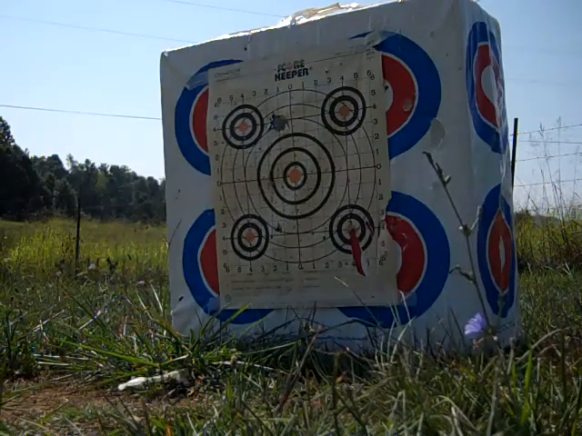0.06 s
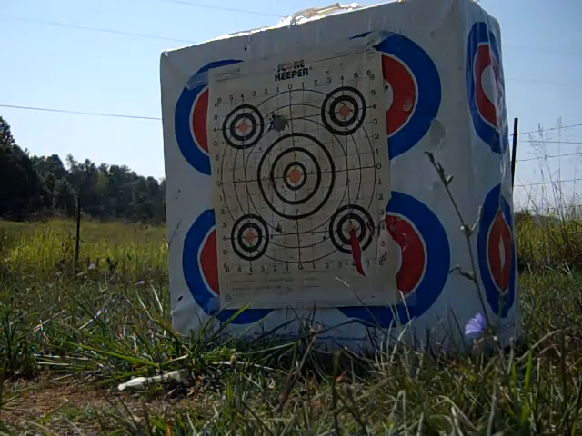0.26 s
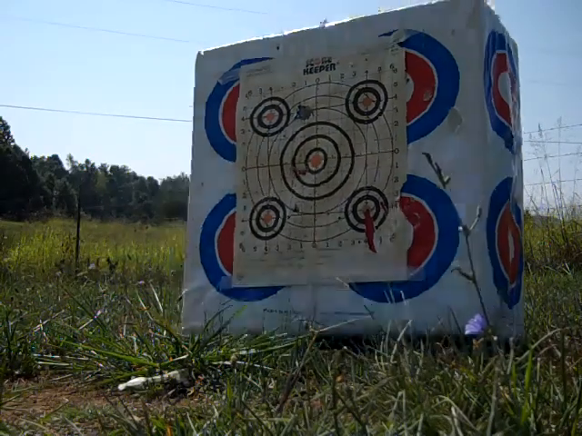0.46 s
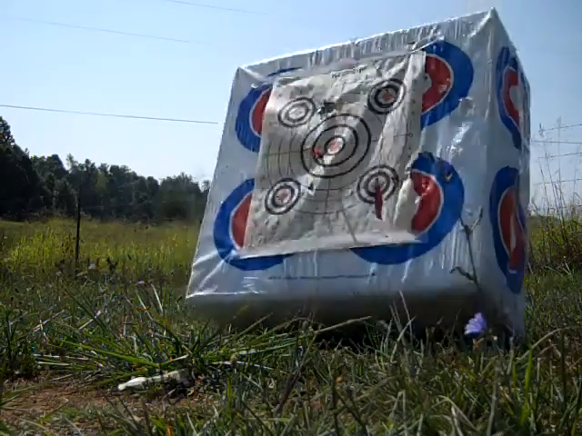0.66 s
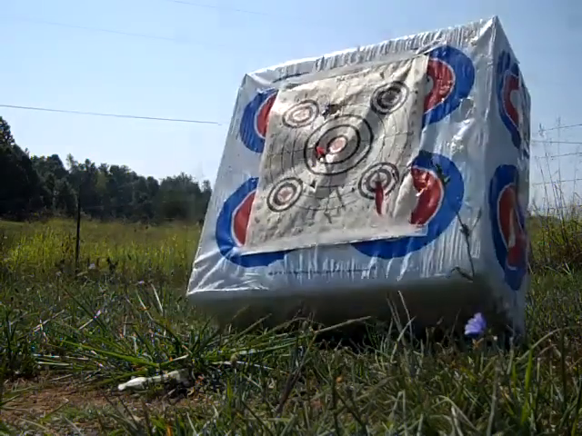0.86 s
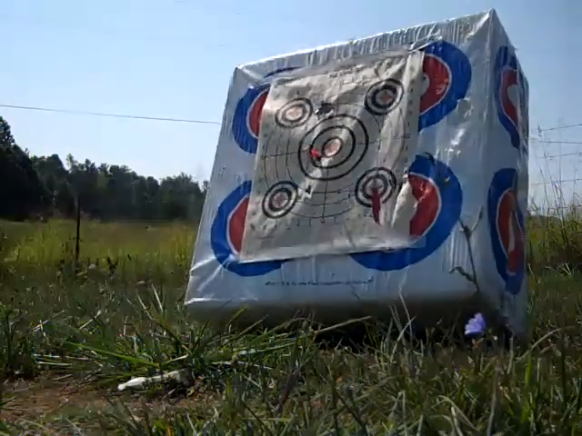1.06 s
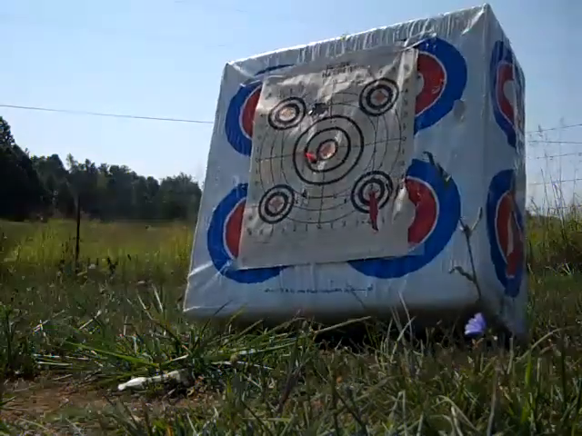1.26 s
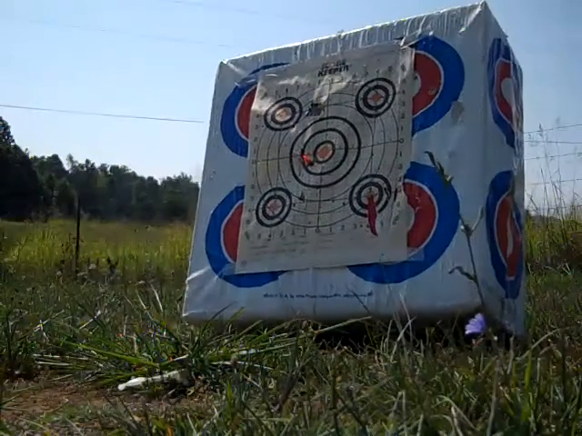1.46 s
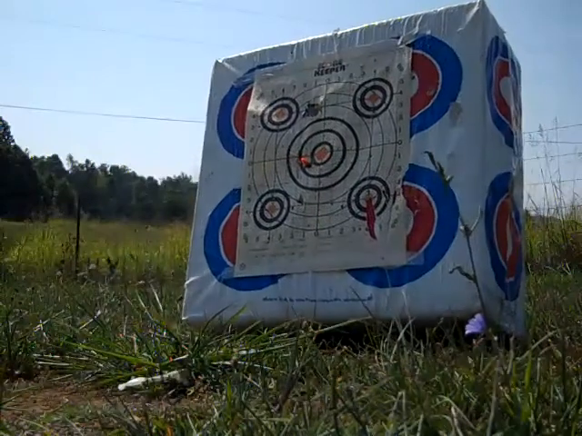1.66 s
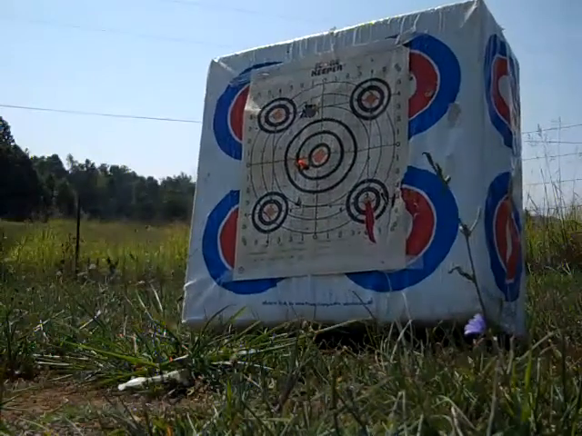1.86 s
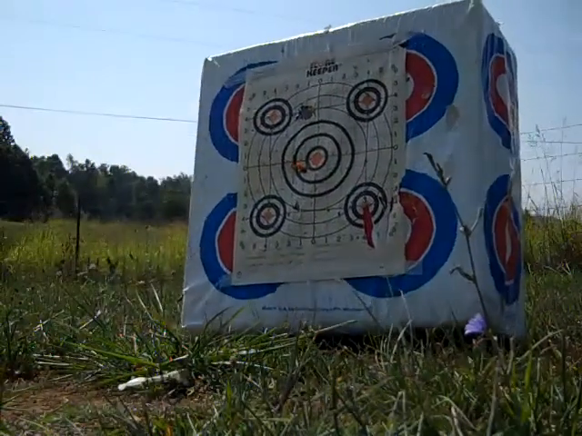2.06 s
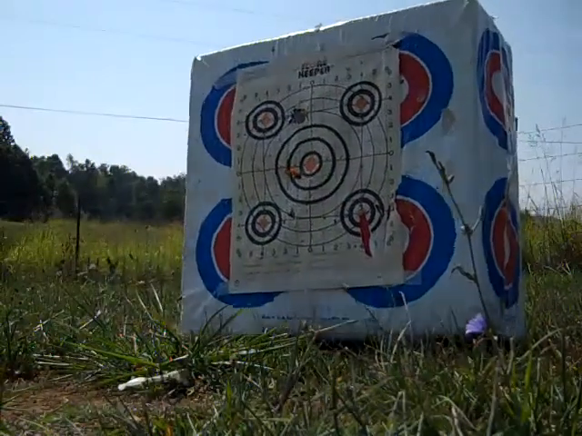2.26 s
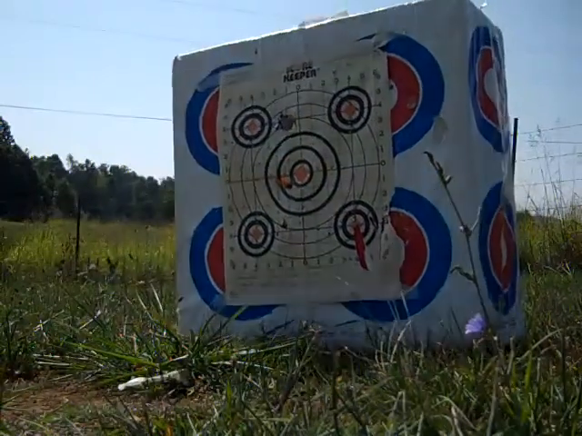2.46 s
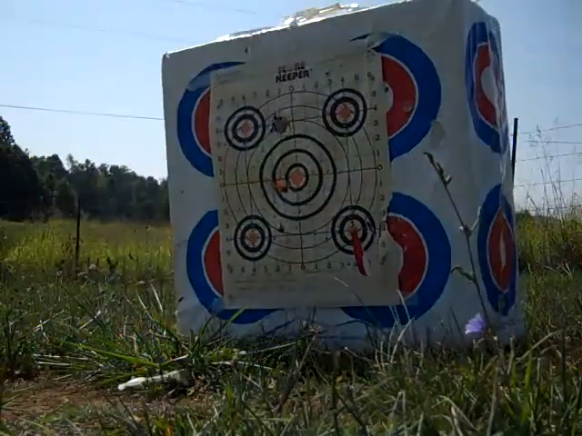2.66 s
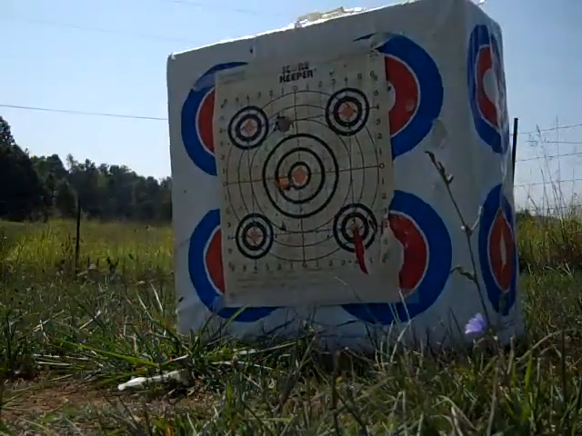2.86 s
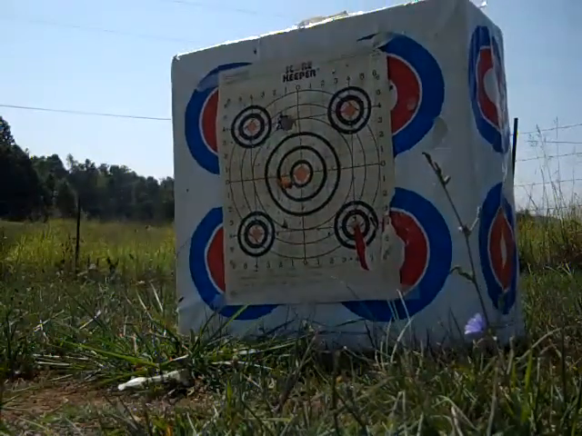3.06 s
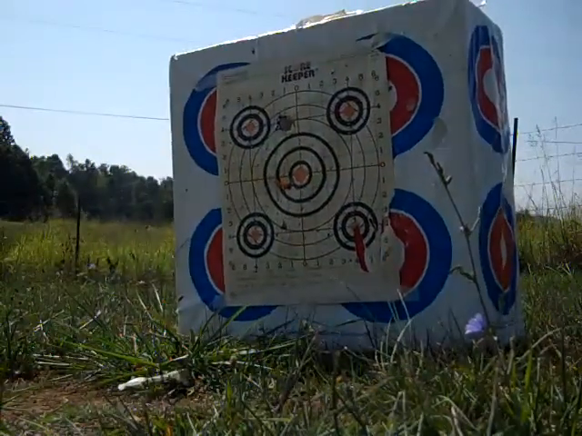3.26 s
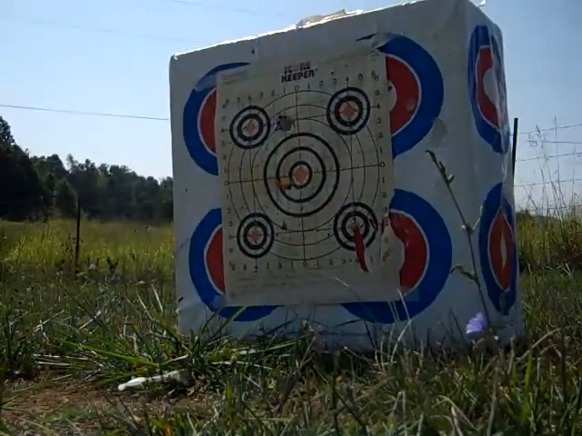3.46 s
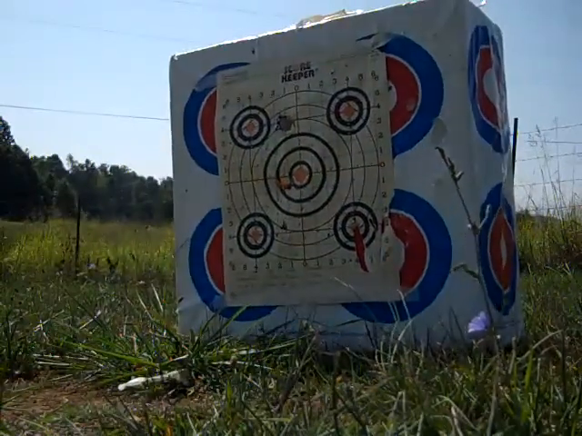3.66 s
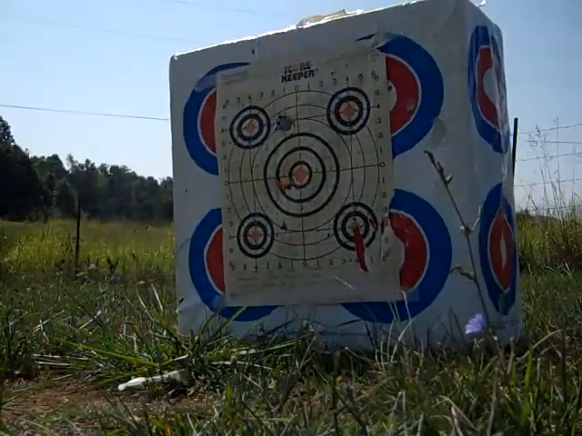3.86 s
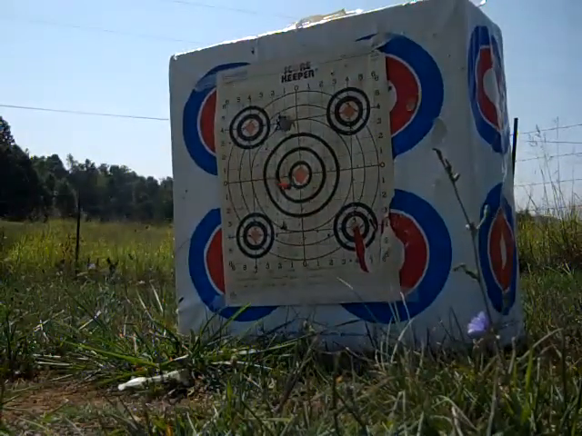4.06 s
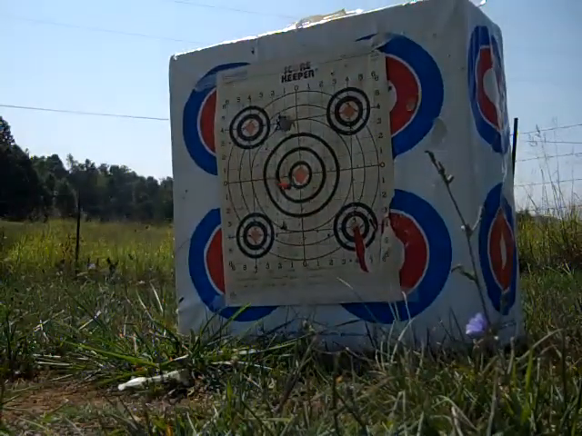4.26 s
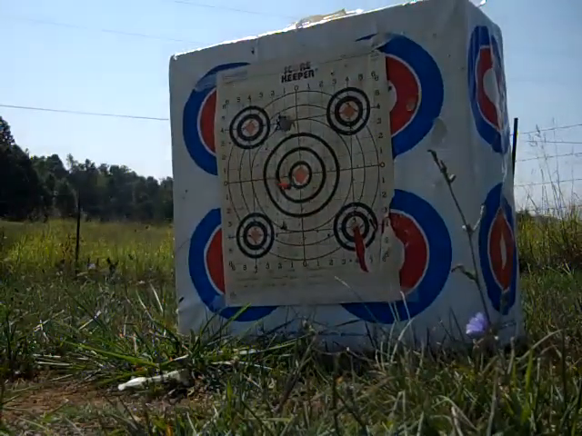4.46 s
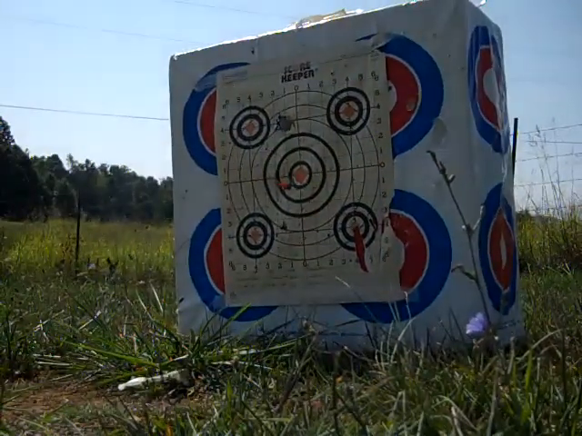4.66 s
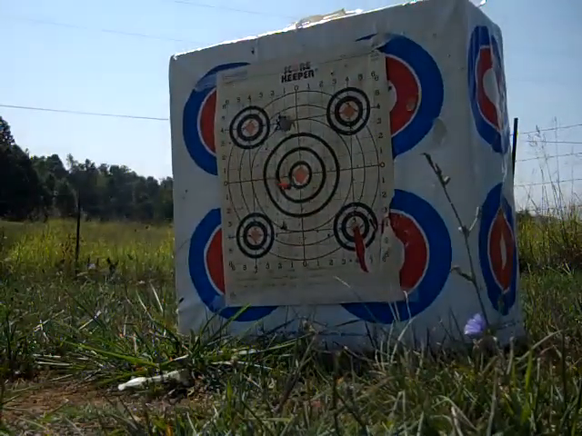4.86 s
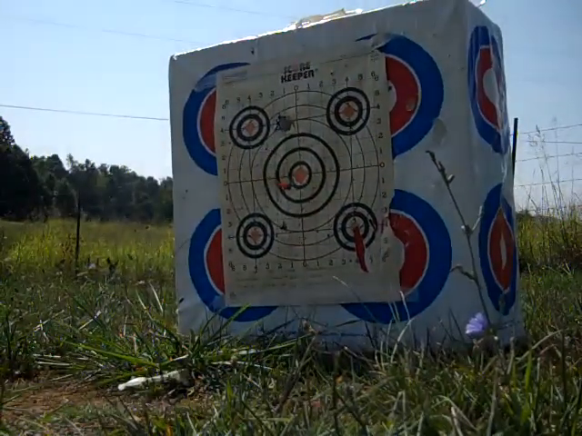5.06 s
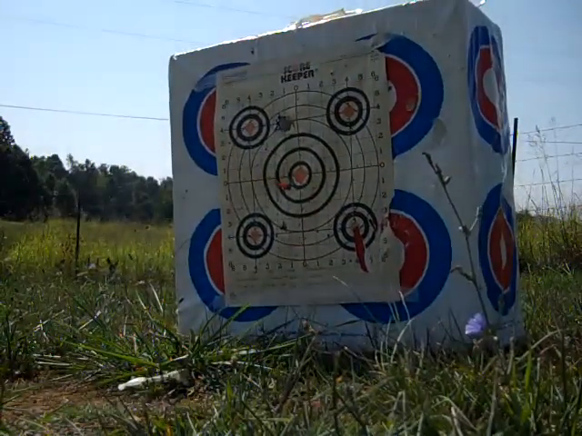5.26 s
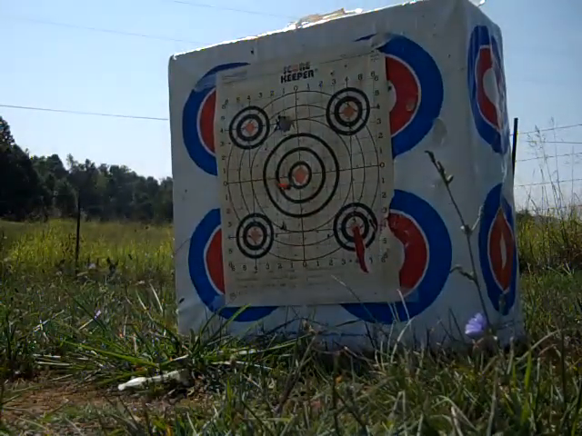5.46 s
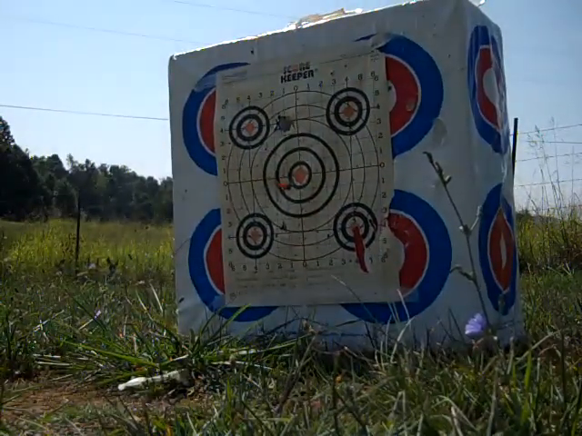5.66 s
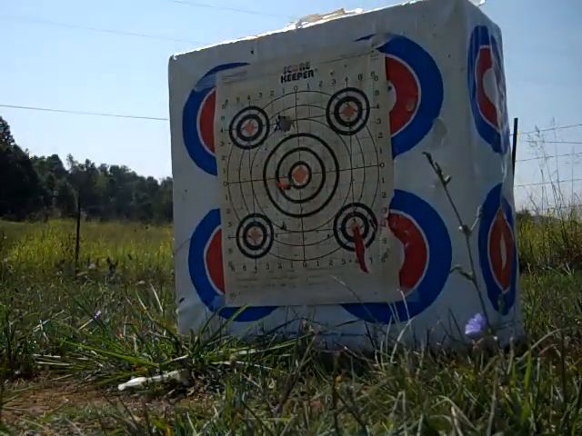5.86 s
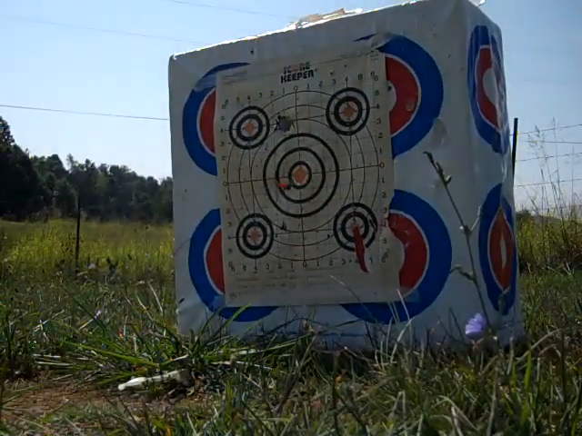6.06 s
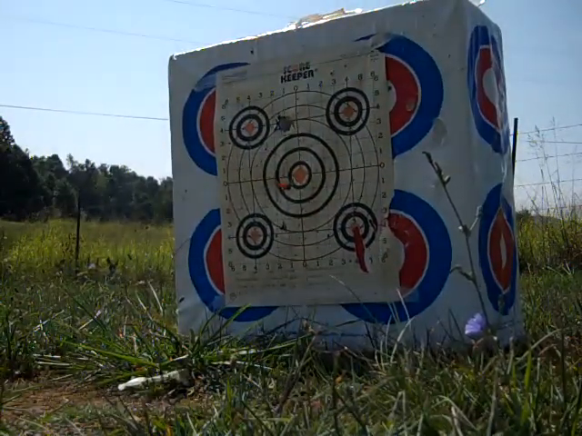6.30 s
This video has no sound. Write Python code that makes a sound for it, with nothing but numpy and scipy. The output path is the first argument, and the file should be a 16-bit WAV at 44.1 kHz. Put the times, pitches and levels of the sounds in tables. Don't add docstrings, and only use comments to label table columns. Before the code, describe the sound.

In an open grassy field, crickets pulse and a far road drones. After a faint bow release, an arrow hisses closer and hits a foam block with a hard, clipped thwack. The shaft scrapes in, plastic wrap pops and crackles as the block rocks, then settles with small knocks. A small stereo camera near the target picks up low wind buffeting and distant bird chirps.

```python
import sys
import numpy as np
from scipy import signal
from scipy.fft import rfft, irfft, next_fast_len
from scipy.io import wavfile
from scipy.ndimage import uniform_filter1d

SR = 44100
rng = np.random.default_rng(int(sys.argv[2]) if len(sys.argv) > 2 else 0)


def gain_from_decibels(decibels):
    exponent = np.asarray(decibels, float) / 20
    return 10 ** exponent


def unload_wav(signal):
    wavfile.write(
        sys.argv[1],
        SR,
        np.round(np.clip(np.atleast_2d(signal).T, -1, 1) * 32767).astype(np.int16),
    )


N = 279153
TIME = np.arange(N) / SR
SIZE = next_fast_len(N)
FREQ = np.arange(SIZE // 2 + 1) * SR / SIZE + 1e-3


def unit(x):
    return x / np.sqrt(np.mean(x ** 2))


def along(hz, values):
    return np.interp(np.log(FREQ), np.log(hz), values)


def colour(x, points):
    hz, db = np.transpose(points)
    return irfft(rfft(x, SIZE) * gain_from_decibels(along(hz, db)), SIZE)[:N]


def ring(x, hz, t60_s):
    pole = np.exp(2j * np.pi * hz / SR - np.log(1000) / (t60_s * SR))
    return signal.lfilter([1], [1, -pole], x).imag


def walk(rate_hz):
    k = int(SR / rate_hz)
    steps = np.repeat(rng.standard_normal(N // k + 1), k)
    return unit(uniform_filter1d(uniform_filter1d(steps, k), k)[:N])


def crackle(spread_db):
    size_db = spread_db * np.minimum(rng.exponential(size=N), 6)
    return unit(rng.standard_normal(N) * gain_from_decibels(size_db))


def add(out, s, db, hz, cycles, swing=0):
    reach = int(2 * cycles / hz * SR)
    i = np.arange(max(int(s * SR) - reach, 0), min(int(s * SR) + reach, N))
    turns = (TIME[i] - s) * hz
    envelope = np.exp(-(1.61 * turns / cycles) ** 2)
    out[i] += gain_from_decibels(db) * np.cos(2 * np.pi * turns + np.round(swing) * np.pi / 2) * envelope


def swell(start, peak, end, db):
    edge_db, die_s = -9, 0.036
    times = [start - die_s, start, peak, end, end + die_s]
    shape_db = np.interp(TIME, times, [-40, edge_db, 0, edge_db, -40], left=-120, right=-120)
    return gain_from_decibels(db + shape_db)


def joined(gains, rest_db):
    return np.sqrt(gain_from_decibels(rest_db) ** 2 + sum(gain ** 2 for gain in gains))


def road():
    # hz, level_db
    rumble = [(60, -17), (150, 1.5), (300, -1.5), (480, -3), (560, -17), (700, -33.5)]
    # start_s, peak_s, end_s, level_db
    vehicles = [(-.1, 0.28, 0.65, -45.5), (1.083, 1.297, 1.51, -45), (1.65, 1.995, 2.45, -47),
                (2.904, 3.246, 3.9, -51), (4.203, 4.657, 5.03, -50.5), (5.05, 5.255, 6.06, -48.5),
                (5.397, 5.65, 5.9, -48), (5.95, 6.15, 6.3, -49), (2.3, 2.45, 2.68, -49)]
    spectrum = [(19.9, -49.5)] + rumble + [(2000, -68)]
    mid = unit(colour(rng.standard_normal(N), spectrum))
    side = unit(colour(rng.standard_normal(N), spectrum))
    level = joined([swell(*row) for row in vehicles], rest_db=-54.5) * gain_from_decibels(2.06 * walk(30))
    return level * np.array([gain_from_decibels(2.0) * (mid + 0.29 * side), gain_from_decibels(-1.5) * (mid - 0.33 * side)])


def wind():
    # hz, level_db
    turbulence = [(12, -41), (30, 2), (60, 5.5), (120, 3.5), (190, -5.5), (320, -17.5), (600, -35)]
    # start_s, peak_s, end_s, level_db, left_minus_right_db
    gusts = [(.05, 0.298, 0.76, -52, -10), (0.677, 0.746, 0.79, -44, 2), (0.934, 1.0, 1.13, -51, 0),
             (1.197, 1.366, 1.43, -49, -16), (1.42, 1.498, 1.54, -38.5, 0), (1.544, 1.626, 1.99, -42, -7.5),
             (1.999, 2.205, 2.2, -52, -4.5), (2.37, 2.497, 2.76, -43, 1.5), (2.8, 2.975, 3.14, -40, 3),
             (3.172, 3.271, 3.42, -37.5, 7), (3.423, 3.478, 3.52, -44, -4), (3.541, 3.618, 3.74, -37, 4.5),
             (3.761, 3.846, 4.13, -41.5, 0.5), (4.05, 4.219, 4.65, -44.5, -5),
             (4.649, 4.78, 5.05, -43.5, -9.5), (5.0, 5.111, 5.2, -40, -8.5), (5.523, 5.619, 5.55, -45.5, 5),
             (6.049, 6.121, 6.2, -55, 6)]
    # centre_s, peak_db,
    # pitch_hz, port (0 left, 1 right)
    buffets = [(0.111, -25, 202, 0), (.982, -31.5, 59.7, 1), (1.445, -30, 133, 1), (1.491, -28, 123, 0),
               (1.567, -26.5, 105, 0), (1.579, -27, 109, 1), (1.602, -24.5, 120, 1), (1.691, -26.5, 111, 1),
               (2.484, -28.5, 98.5, 0), (2.527, -29, 117, 0), (3.023, -28, 91.3, 1), (3.078, -27, 74.4, 1),
               (3.216, -21, 111, 0), (3.234, -16.5, 129, 0), (3.287, -26, 82, 1), (3.293, -20.5, 164, 0),
               (3.313, -26, 77.5, 1), (3.347, -20.5, 167.5, 0), (3.606, -25, 98, 1), (3.619, -23.5, 113, 0),
               (3.647, -28.5, 85, 0), (3.655, -16, 154, 1), (4.152, -24.5, 122, 1), (4.19, -25.5, 92, 1),
               (4.291, -27, 121, 0), (4.322, -26, 108.5, 1), (4.397, -28, 104, 1), (4.839, -24.5, 97, 1),
               (5.068, -26.5, 95.4, 1), (5.09, -26.5, 89, 1), (3.239, -35.5, 410, 0), (3.241, -25, 251, 0),
               (3.352, -37, 410, 0), (3.587, -29.5, 120, 0), (3.558, -28.5, 70, 1), (3.452, -31.5, 171, 0)]
    beds = []
    for side in (1, -1):
        bed = unit(colour(rng.standard_normal(N), turbulence + [(3000, -70.5)]))
        gains = [swell(start, peak, end, db) * gain_from_decibels(side * pan_db / 2)
                 for start, peak, end, db, pan_db in gusts]
        beds.append(bed * gain_from_decibels(2.0 * walk(20)) * joined(gains, rest_db=-53))
    out = np.array(beds)
    for (s, db, hz, port), way in zip(buffets, rng.standard_normal(len(buffets))):
        eddy = np.zeros(N)
        add(eddy, s, db, hz, cycles=0.9)
        out[int(port > .5)] += np.sign(way) * eddy
    return out


def chorus():
    # hz, left_db, right_db
    field = [(610, -82.5, -98), (1086, -88.5, -100), (2100, -96, -100), (2895, -89.5, -91.5),
             (4600, -81, -83), (4880, -83.5, -85.5), (6000, -82, -80), (7000, -77, -74), (7570, -70, -80.5),
             (8270, -71.5, -83.5), (8840, -83.5, -104), (9405, -88, -116), (11130, -91.5, -106),
             (13990, -91, -107)]
    # hz, shared_part (0-1), left_lead (radians)
    likeness = [(600, 0.24, 1.5), (1500, 0.09, 2.9), (3100, 0.48, 1.3), (5070, 0.46, 3.2),
                (6370, 0.99, 3.88), (7010, 0.12, 4.67), (8150, 0.06, 8), (10000, 0, 6.5)]
    # start_s, peak_s, end_s, level_db
    breeze = [(3.9, 4.5, 7.5, -2.5)]
    hz, *port_db = np.transpose(field)
    like_hz, alike, lead = np.transpose(likeness)
    share = np.clip(along(like_hz, alike), 0, 1)
    flicker = np.array([.6 * walk(14 + 6 * k) for k in range(3)])
    common, left, right = rfft(rng.standard_normal((3, N)) * gain_from_decibels(flicker), SIZE)
    shared = np.array([common, common * np.exp(-1j * along(like_hz, lead))])
    pair = np.sqrt(share) * shared + np.sqrt(1 - share) * np.array([left, right])
    fade = np.clip(FREQ / hz[0], 0, 1) ** 2
    pair = pair * fade * gain_from_decibels(np.array([along(hz, db) for db in port_db])) * np.sqrt(SR / 2)
    top = np.clip((FREQ - 9000) / 1500, 0, 1)
    leaves = joined([swell(*row) for row in breeze], rest_db=-4) * gain_from_decibels(1.4 * walk(60))
    return irfft(pair * (1 - top), SIZE)[:, :N] + leaves * irfft(pair * top, SIZE)[:, :N]


def crickets():
    # pitch_hz, level_db, chirp_s, left_minus_right_db
    singers = [(8080, -37.5, 0.018, 25.5), (8330, -39.5, 0.028, 28), (8680, -47.5, 0.01, 21)]
    # first_s, period_s
    rhythm = [(.022, .1318), (.012, .1473), (.012, .07365)]
    # start_s, end_s, pitch_hz, beats_per_s, level_db
    passing = (2, 4, 5745.5, 60.5, -71)
    out = np.zeros((2, N))
    for (first, period), (hz, db, chirp, pan_db) in zip(rhythm, singers):
        beat = np.round((TIME - first) / period)
        size_db = 1.9 * rng.standard_normal(200)[beat.astype(int)]
        shape = np.exp(-((TIME - first - beat * period) / chirp * 2) ** 2)
        tone = np.sin(2 * np.pi * hz * np.cumsum(1 + 0.001496 * walk(60)) / SR)
        out += tone * shape * gain_from_decibels(db + size_db) * np.array([[1], [gain_from_decibels(-pan_db)]])
    start, end, hz, rate, db = passing
    rise_fall = np.sqrt(np.sin(np.pi * np.clip((TIME - start) / (end - start), 0, 1)))
    beats = np.exp(-(TIME * rate % 1) / .25)
    trill = gain_from_decibels(db) * rise_fall * unit(ring(crackle(1.5) * beats, hz, 0.0043))
    return out + np.array([trill, -trill])


def birds():
    # pitch_hz, t60_s, level_db
    twitter = [(4240, 0.014, -62.5), (4460, 0.02, -60.5), (4780, 0.015, -68.5)]
    # start_s, length_s, top_hz, last_hz, level_db
    chirps = [(1.483, .06, 3800, 3100, -52), (2.295, .11, 4650, 4150, -51), (2.71, .03, 4500, 4250, -50),
              (2.79, .03, 4400, 4300, -51), (2.96, .025, 4650, 4450, -50), (3.03, .04, 4400, 4300, -52),
              (3.08, .03, 4400, 4100, -48), (3.46, .09, 5550, 4350, -44), (3.66, .035, 4750, 4350, -48),
              (3.91, .025, 4750, 4600, -49), (3.953, .035, 4800, 4400, -45), (4.28, .04, 4700, 4230, -50.5),
              (4.725, .1, 5600, 4300, -44), (5.842, 0.03, 3850, 3400, -47), (5.983, .04, 4350, 3450, -46),
              (6.12, .03, 4000, 3500, -48), (6.244, .03, 4050, 3530, -47)]
    lead_s = .00009
    out = np.zeros(N)
    for hz, t60, db in twitter:
        out += gain_from_decibels(db + 2.2 * walk(24)) * unit(ring(crackle(1.5), hz, t60))
    for s, length, top_hz, last_hz, db in chirps:
        u = np.clip((TIME - s) / length, 0, 1)
        hz = np.interp(u, [0, .25, 1], [.985 * top_hz, top_hz, last_hz])
        shape = np.sin(np.pi * u ** 0.65) ** 0.65
        out += gain_from_decibels(db) * shape * np.sin(2 * np.pi * np.cumsum(hz) / SR)
    out *= gain_from_decibels(1.8 * walk(150))
    return np.array([out, np.roll(out, int(lead_s * SR))])


def folds(clicks, modes):
    return unit(sum(gain_from_decibels(db) * width * ring(clicks, hz, np.log(1000) / np.pi / width)
                    for hz, width, db in modes))


def wrap():
    # pitch_hz, width_hz, level_db
    dull_folds = [(610, 80, -6), (760, 260, -5), (950, 200, 0), (1530, 200, 1), (2170, 550, 0.5)]
    # pitch_hz, width_hz, level_db
    tight_folds = [(2700, 389, 1.5), (3100, 190, -0.5), (3670, 180, 1.5), (4310, 98, -0.5),
                   (5420, 810, -12.5), (6500, 1200, -16)]
    # start_s, peak_s, end_s, level_db, brightness_db
    creases = [(0.484, 0.5, 0.53, -21, -4.5), (.51, 0.537, 0.69, -33.5, 2.5), (0.581, .65, .705, -39, 0.5),
               (.68, 0.718, .82, -46, -7.5), (0.786, 0.852, .9, -49, 7), (0.88, 0.93, 1.05, -49.5, -7),
               (1.036, 1.142, 1.203, -53.5, 2.5), (1.15, 1.4, 2.4, -63.5, -0.5),
               (2.156, 2.555, 2.92, -55.5, -1.5), (2.833, 3.008, 3.15, -57.5, -3)]
    # start_s, peak_s, end_s, level_db
    drags = [(0.504, 0.51, 0.52, -21), (0.58, .63, 0.69, -36), (0.67, 0.696, 0.76, -36.5),
             (0.81, 0.855, 1.01, -43), (0.99, 1.143, 1.29, -47.5), (2.5, 2.658, 3.5, -72)]
    # start_s, level_db
    grass_ticks = [(0.8627, -49), (0.9228, -50), (1.2314, -49), (1.4608, -47), (1.4923, -44), (2.4251, -49),
                   (2.5129, -50), (2.6352, -46), (4.2934, -48), (4.6476, -46), (5.1509, -47),
                   (5.8773, -45.5), (5.9047, -49), (6.0299, -50)]
    # centre_s,
    # peak_db, pitch_hz, cycles
    snaps = [(.1125, -36.5, 700, 0.78), (.4778, 3, 6500, 6), (0.468, -5, 9000, 2.5), (0.4719, -16, 8470, 2),
             (0.523, -17, 6500, 2.5), (.531, -15, 5000, 0.5), (.576, -16, 4500, 1.5),
             (0.597, -17, 6500, 1.8), (0.6213, -27, 6000, 1.2), (.657, -39, 900, 0.57),
             (.713, -25, 1980, 0.79), (.726, -25, 6200, 2.5), (.745, -35, 2100, 1.4), (.838, -33, 398, 1.6),
             (0.8478, -24, 304, 1.3), (0.864, -30, 291, 1.8), (.906, -34.5, 3100, 3),
             (1.0625, -30.5, 600, 0.79), (1.097, -41, 2700, 1.5), (1.2325, -35, 6000, 3),
             (1.4602, -36, 5000, 6), (1.466, -32, 2400, 1), (2.494, -38, 1700, 1.5),
             (2.637, -37.5, 1051, 3), (3.065, -49, 1690, 4.3)]
    # centre_s, peak_db, pitch_hz, cycles, swing (quarter turns)
    knocks = [(1.0583, -25, 1050, .85, 2), (1.1725, -31, 2000, .6, 2), (1.4622, -20.5, 1700, .8, 1)]
    clicks = crackle(2.2) * gain_from_decibels(1.8 * walk(200) + .8 * walk(50))
    dull, tight = folds(clicks, dull_folds), folds(clicks, tight_folds)
    dull_gains = [swell(*row[:-1]) for row in creases]
    tight_gains = [gain * gain_from_decibels(row[-1]) for gain, row in zip(dull_gains, creases)]
    drag = unit(ring(crackle(5.5), 365, 0.22))
    out = joined([swell(*row) for row in drags], rest_db=-90) * drag
    out += joined(dull_gains, rest_db=-90) * dull
    out += joined(tight_gains, rest_db=-90) * tight
    for s, db in grass_ticks:
        add(out, s + .001, db + 8, 11000, cycles=2.5)
    for snap in snaps + knocks:
        add(out, *snap)
    return out


def cracks():
    # start_s, dull_db, bright_db, t60_s
    pops = [(.5225, -34.5, -30, .02), (.5305, -34.5, -27, 0.022), (.543, -38, -32, .015),
            (0.5721, -31, -27, .015), (.576, -31, -30, .03), (.589, -36, -32, .015),
            (0.5964, -29, -26, 0.034), (0.62, -30.5, -28.5, 0.037), (.629, -44, -33, 0.018),
            (0.6556, -27.5, -29.5, .05), (.666, -34.5, -32, .02), (.686, -32.5, -33.5, .04),
            (0.7124, -32, -38.5, 0.025), (0.745, -38, -38.5, 0.042), (0.825, -35, -40, .02),
            (0.8334, -44, -40.5, 0.021), (.839, -42, -39, 0.015), (0.857, -40, -37, 0.024),
            (.864, -47, -39, 0.025), (.875, -46, -39, 0.023), (0.888, -46, -42.5, 0.016),
            (.933, -42, -50, .02), (1.058, -45, -51.5, .04), (1.098, -48, -42, .02),
            (1.118, -49.5, -40, .02), (1.154, -50, -41, 0.034), (1.172, -44, -42, 0.016),
            (1.232, -50, -40, 0.036), (1.463, -39, -44.5, 0.038), (2.202, -51, -56.5, .02),
            (2.322, -52, -54.5, .02), (2.4342, -43, -52, 0.017), (2.4935, -46, -52, 0.028),
            (2.575, -46, -53, .03), (2.6352, -42.5, -45, .04), (3.061, -50.5, -56, .04)]
    # hz, level_db
    dull_colour = [(300, -24.5), (600, 0), (950, 0.5), (1300, -7.5), (2000, -6), (3000, -9.5), (5000, -28)]
    # hz, level_db
    bright_colour = [(1200, -22), (2000, -7), (2700, 4.5), (3800, 0.5), (5100, -10.5), (6400, -5.5),
                     (8500, -8.5), (12000, -20)]
    # start_s, peak_s, end_s, level_db
    quiver = (.53, .592, .67, -32)
    quiver_hz = 890
    dull, bright = np.zeros((2, N))
    for s, dull_db, bright_db, t60 in pops:
        i = np.arange(int(s * SR), int((s + t60) * SR))
        fall_db = -60 * (TIME[i] - s) / t60
        dull[i] += gain_from_decibels(dull_db + fall_db)
        bright[i] += gain_from_decibels(bright_db + fall_db)
    out = dull * unit(colour(crackle(2.5), dull_colour))
    out += bright * unit(colour(crackle(2.495), bright_colour))
    taps = crackle(2.5)
    rattle = ring(taps, quiver_hz, 0.08) + gain_from_decibels(-1.5) * ring(taps, 1.11 * quiver_hz, 0.07)
    return out + swell(*quiver) * unit(rattle)


def flight():
    release_s, release_db, release_t60_s = 0.11, -39.5, .3
    hit_s, near_db, near_s, fade_db_per_decade = .477, -21, 0.018, 36
    abreast_s, abreast_db = .453, 6.5
    since = TIME - release_s
    puff_db = release_db + np.where(since < 0, 1500 * since, -60 * since / release_t60_s)
    nearing_db = near_db - fade_db_per_decade * np.log10(1 + np.abs(hit_s - TIME) / near_s)
    nearing_db += abreast_db * (TIME > abreast_s)
    return (gain_from_decibels(puff_db) + gain_from_decibels(nearing_db) * (since > 0)) * (TIME < hit_s)


def arrow():
    # hz, level_db
    vanes = [(600, -30.5), (1300, -19), (2500, -13.5), (4500, -12), (7000, -7), (9000, -2), (14000, -18.5)]
    # start_s, push_db, direction, scrape_db, scrape_t60_s
    jolts = [(0.4765, 1.5, -1, 9.5, 0.025), (.4790, -9.5, 1, 10, 0.016), (.4810, 4, 1, 0, 0.013),
             (0.484, -1, -1, 11.5, 0.0068), (0.4878, 0.5, 1, -6, 0.015), (0.492, -6.5, -1, 3, 0.033),
             (0.4948, -1, -1, -4.5, 0.0092), (.5000, 0, -1, -31, 0.07)]
    # pitch_hz, level_db, t60_s
    block = [(56, -26, .1), (121, -22, 0.12), (242.5, -5.5, 0.14), (284.8, -16, 0.038), (347, -12.5, 0.07),
             (472, -4, 0.0387), (644, -7, 0.04), (729, -15, 0.048), (800, -13, 0.0403), (868, -10, 0.03),
             (1020, -11.5, 0.03), (1570, -12.5, 0.02), (1680, -18, .015)]
    # hz, level_db
    scrape_colour = [(500, -23), (1200, -11.5), (2000, 3.5), (2800, 6), (4000, 0), (6500, -4), (9000, -4.5),
                     (14000, -1.5)]
    hiss = unit(colour(crackle(3.6), vanes)) * flight() * gain_from_decibels(0.91 * walk(330))
    kicks, scrape = np.zeros(N), np.zeros(N)
    for s, push_db, way, scrape_db, t60 in jolts:
        kicks[int(s * SR)] = np.sign(way) * gain_from_decibels(push_db)
        scrape += (TIME > s) * gain_from_decibels(scrape_db - 60 * np.clip(TIME - s, 0, 1) / t60)
    body = sum(gain_from_decibels(db) * ring(kicks, hz, t60) for hz, db, t60 in block)
    mid = scrape * unit(colour(crackle(2.7), scrape_colour))
    side = scrape * unit(colour(crackle(2.7), scrape_colour))
    thud = body * gain_from_decibels(np.array([[-1.2], [1.2]]))
    return hiss + thud + gain_from_decibels(-0.5) * mid + gain_from_decibels(-15.0) * side * np.array([[1], [-1]])


def scene():
    # hz, level_db
    ports = [
        [(120, -5.5), (1000, -0.5), (5000, 0), (6800, 1.5), (8200, 5), (9500, 0.5), (14000, -5.5)],
        [(120, -5), (1000, -0.5), (5000, -3.5), (6800, 6.5), (8200, -11), (9500, -19), (14000, -16)],
    ]
    far = road() + wind() + chorus() + crickets() + birds()
    near = wrap() + cracks() + arrow()
    return far + np.array([colour(np.roll(near[k], k), points) for k, points in enumerate(ports)])


def roll_off(x):
    return signal.sosfilt(signal.butter(12, 14210, fs=SR, output="sos"), x)


def record(dry):
    trip_s = TIME[np.argmax(np.abs(dry).max(axis=0) > 1.1)]
    gain_db = np.interp(TIME - trip_s, [.019, .021, .2, .36], [0.5, -9.5, -7.5, 0.5])
    clipped = np.clip(dry * gain_from_decibels(gain_db), -.8, .8)
    low_cut = signal.butter(2, 44.94, "high", fs=SR, output="sos")
    top_cut = signal.ellip(8, .2, 70, 14200, fs=SR, output="sos")
    coupled = signal.sosfilt(low_cut, clipped)
    return roll_off(signal.sosfilt(top_cut, coupled))


dry = scene()
out = record(dry)
unload_wav(out)
```